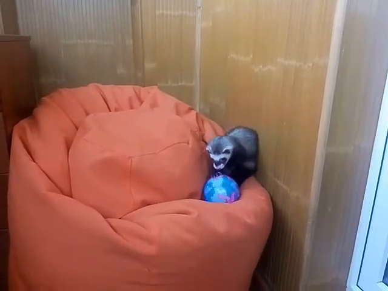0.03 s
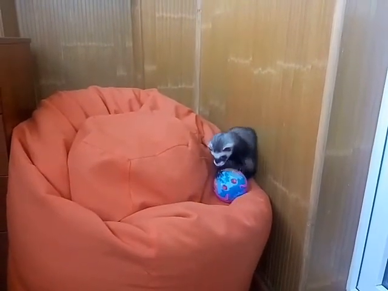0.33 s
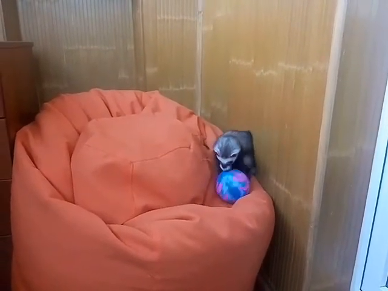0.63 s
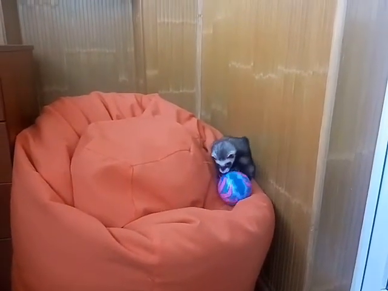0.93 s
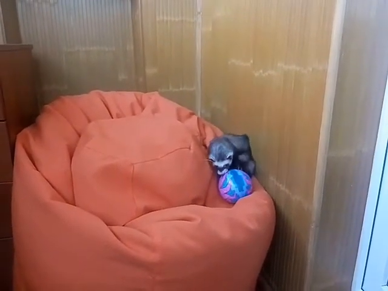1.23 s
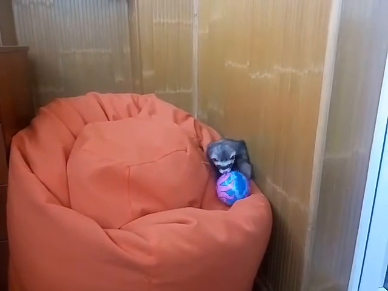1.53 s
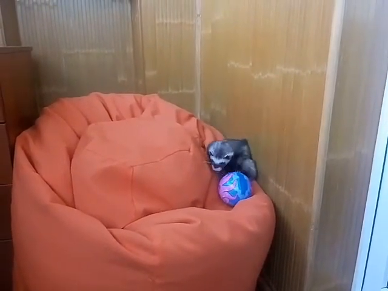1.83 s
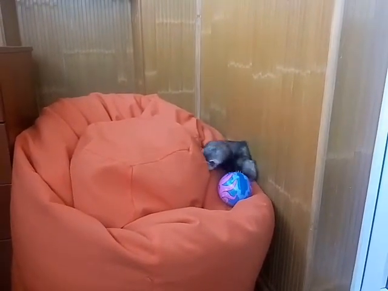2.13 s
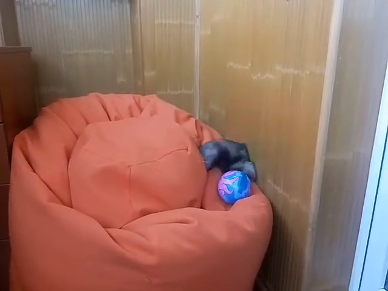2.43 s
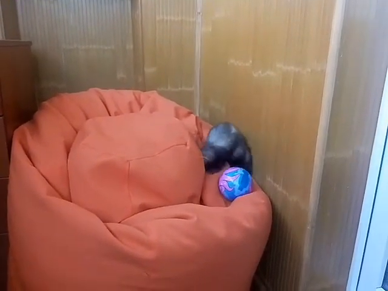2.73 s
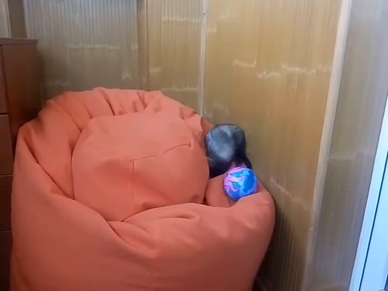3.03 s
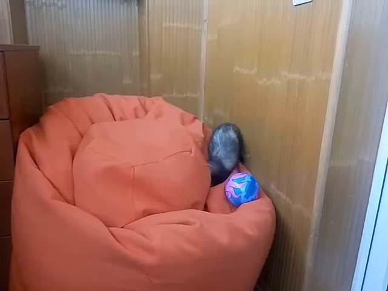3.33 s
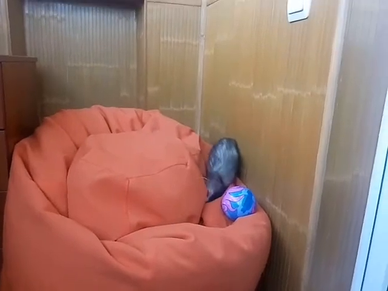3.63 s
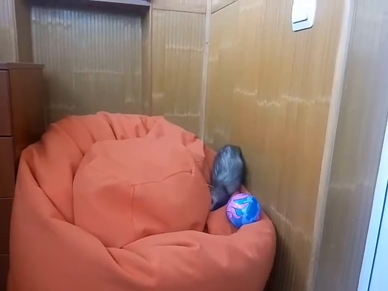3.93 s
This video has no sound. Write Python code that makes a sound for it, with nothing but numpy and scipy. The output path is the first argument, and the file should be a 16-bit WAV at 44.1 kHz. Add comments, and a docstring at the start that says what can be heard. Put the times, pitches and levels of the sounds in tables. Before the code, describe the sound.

A few sharp camera handling knocks, after faint rubbing and soft bumps on a bean bag.

```python
"""Faint rubbing, swishing cloth and soft bumps, then a few close knocks and a rattling clack.
A ferret noses a ball about on a bean bag in a small, quiet panelled room; each rub is many tiny slips.
Close to the microphone a hand-held camera shifts in the grip: its case thumps, ticks, knocks once
and closes with the clack. A low hum and a faint hiss lie underneath."""
import sys
import numpy as np
from scipy import signal
from scipy.fft import rfft, irfft
from scipy.io import wavfile

SR = 44100
rng = np.random.default_rng(int(sys.argv[2]) if len(sys.argv) > 2 else 0)


def master(y):
    """Save y as 16-bit WAV."""
    cut = np.clip(np.atleast_2d(y).T, -1, 1)
    pcm = np.round(cut * 32767)  # scale
    wavfile.write(sys.argv[1], SR, pcm.astype(np.int16))


N = 176400
T = np.arange(N) / SR


def from_db(db):
    return 10 ** (np.asarray(db) / 20)


def rms_one(x):
    return x / np.sqrt(np.mean(x ** 2) + 1e-20)


def peak_one(x):
    return x / np.abs(x).max()


def level(rows):
    """Loudness over time, from rows of t/s, level/dB."""
    return from_db(np.interp(T, *np.transpose(rows), left=-120, right=-120))


def swell(s, length):
    """A bell-shaped rise and fall."""
    return np.exp(-2 * ((T - s) / length) ** 2)


def burst(s, attack_s, t60_s):
    """A quick rise, then a fade; t60 is the time it takes to drop by 60 dB."""
    age = np.maximum(T - s, 0)
    return np.minimum(age / attack_s, 1) * from_db(-60 * age / t60_s)


def click(size=8192):
    return signal.unit_impulse(size)


def coloured_click(colour, size=8192):
    """A click whose tone follows rows of f/Hz, level/dB."""
    hz, db = np.transpose(colour)
    grid = np.maximum(np.arange(size // 2 + 1) * SR / size, 1)
    spectrum = from_db(np.interp(np.log(grid), np.log(hz), db))
    cepstrum = irfft(np.log(spectrum))
    cepstrum[1:size // 2] *= 2   # folding it packs the energy at the start of the click
    cepstrum[size // 2 + 1:] = 0
    return peak_one(irfft(np.exp(rfft(cepstrum))))


def through(x, response):
    return signal.fftconvolve(x, response)[:N]


def butter(x, hz, kind, order=2):
    return signal.sosfilt(signal.butter(order, hz, kind, fs=SR, output="sos"), x + 1e-18)


def resonate(x, hz, width):
    """A resonance: lets through a band around one pitch."""
    r = np.exp(-np.pi * width / SR)
    feedback = [1, -2 * r * np.cos(2 * np.pi * hz / SR), r * r]
    return signal.lfilter(np.array([1, 0, -1]) * (1 - r * r) / 2, feedback, x)


def narrowed(x, hz, width_hz):
    """The same resonance twice, for steep sides."""
    return rms_one(resonate(resonate(x, hz, width_hz), hz, width_hz))


def rings(x, table):
    """Several resonances side by side."""
    return rms_one(sum((-1) ** k * from_db(db) * resonate(x, hz, width)
                       for k, (hz, width, db) in enumerate(table)))


def delay_band(x, hz, width_hz):
    """One band arrives a little late, which thickens a click."""
    r = np.exp(-np.pi * width_hz / SR)
    feedback = [1, -2 * r * np.cos(2 * np.pi * hz / SR), r * r]
    return signal.lfilter(feedback[::-1], feedback, x)


def wander(x, share, per_s):
    """All pitches drift slowly up and down together."""
    speed = 1 + share * rms_one(butter(rng.standard_normal(N), per_s, "low"))
    return np.interp(np.cumsum(speed) % N, np.arange(N), x)


def add(out, s, sound):
    i = int(s * SR)
    out[i:i + len(sound)] += sound[:N - i]


def strikes(rows, sound):
    """The same sound at each row of t/s, level/dB."""
    out = np.zeros(N)
    for s, db in rows:
        add(out, s, from_db(db) * sound)
    return out


def slips(per_s, spread_db=2.5):
    """Friction: tiny random slips of uneven size."""
    pulses = (rng.random(N) < per_s / SR) * rng.choice([-1, 1], N)
    return pulses * from_db(spread_db * np.minimum(rng.exponential(1, N), 5))


def background(hiss_db=-67.5, hum_db=-68.5, hum_hz=88.7):
    """Faint hiss and a wavering low hum."""
    # tone of the hiss: f/Hz, level/dB
    hiss_colour = [(15, -30), (25, -11), (137, -1.5), (263, -9), (373, -16), (1130, -11.5), (1790, -21.5),
                   (4490, -21.5), (6740, -26), (8140, -38), (13600, -38.5), (16000, -51)]
    hiss, hum = rng.standard_normal((2, N))
    hiss = butter(through(hiss, coloured_click(hiss_colour)), 48.1, "high")
    hum = resonate(hum, hum_hz, width=7.7)
    return from_db(hiss_db) * rms_one(hiss) + from_db(hum_db) * rms_one(hum)


def room(x, t60_s=.177, echo_db=-34.5):
    """A short, dull echo from the panelled walls."""
    t = T[:SR // 2]
    tail = butter(rng.standard_normal(len(t)), 3000, "low") * from_db(-60 * t / t60_s) * (t > .005)
    return from_db(echo_db) * through(x, tail / np.sqrt(np.sum(tail ** 2)))


def panels(x, t60_s=.14, echo_db=-4.5):
    """Close echoes off the wall panels make a small sound boxy."""
    t = T[:SR // 4]
    echoes = rng.standard_normal(len(t)) * from_db(-60 * t / t60_s)
    wet = from_db(echo_db)
    return (x + wet * through(x, echoes / np.sqrt(np.sum(echoes ** 2)))) / np.sqrt(1 + wet ** 2)


def rumble():
    """Dull shudders as the grip shifts."""
    # strength of the shudders: t/s, level/dB
    loudness = [(0, -64), (.07, -56), (.25, -70), (.38, -57.5), (.52, -61), (.65, -77), (.83, -56),
                (1.0, -77.5), (1.15, -55), (1.28, -71), (1.39, -56.5), (1.5, -73), (2.7, -73),
                (2.78, -45.5), (2.85, -36.5), (2.95, -39), (3.0, -43.5), (3.12, -58.5), (3.24, -55),
                (3.33, -67), (3.39, -49.5), (3.47, -60), (3.58, -44.5), (3.65, -58.5), (3.75, -72)]
    # their tone: f/Hz, level/dB
    colour = [(30, -28.5), (65, -6.5), (95, 2.5), (140, -6), (280, -13.5), (480, -23), (800, -29),
              (2000, -74)]
    return level(loudness) * rms_one(through(slips(per_s=900, spread_db=1), coloured_click(colour)))


def cloth(slips_per_s=5000, rasp_db=-2.5):
    """The cover of the bean bag swishes and rasps with each move."""
    # moves of the cover: peak t/s, length/s, level/dB
    swishes = [(.17, 0.39, -71.5), (0.378, 0.075, -65), (0.66, 0.15, -73), (0.805, 0.084, -72.5),
               (0.998, 0.09, -79), (1.537, 0.086, -71), (1.757, 0.093, -75.5), (2.339, 0.1, -67.5),
               (2.552, 0.13, -70), (2.777, 0.085, -63.5), (2.991, 0.17, -63), (3.255, 0.088, -69),
               (3.641, 0.11, -68), (3.807, 0.14, -71)]
    # tone of the swish: f/Hz, level/dB
    colour = [(300, -28), (1000, 2.5), (2000, 3.5), (3000, 2), (4700, -1), (6300, -8), (7800, -39),
              (14000, -48.5)]
    # raspy resonances: f/Hz, width/Hz, level/dB
    rasp_rings = [(2343, 130, 2), (3520, 140, -2), (4610, 170, -3)]
    motion = sum(from_db(db) * swell(s, length) for s, length, db in swishes)
    hiss = rms_one(through(slips(slips_per_s), coloured_click(colour)))
    rasp = butter(rings(slips(slips_per_s), rasp_rings), 6000, "low", order=6)
    rasp = wander(rasp, share=.05, per_s=3)   # the cover stretches
    return motion * rms_one(panels(hiss + from_db(rasp_db) * rasp))


def rubbing(slips_per_s=4000, turn_s=2.05, turn_length_s=.4):
    """The ferret rubs the ball, then turns to the wall: hollow slips that at times scrape or squeak."""
    # strength of the rubbing: t/s, level/dB
    loudness = [(0, -57), (.04, -62), (.1, -61), (.16, -52), (.215, -57), (.31, -58), (.39, -52.5),
                (.46, -65.5), (.56, -78), (.62, -57.5), (.69, -59.5), (.76, -62.5), (.83, -61.5),
                (.93, -71.5), (1.0, -60.5), (1.07, -63.5), (1.16, -68), (1.36, -72.5), (1.45, -67),
                (1.6, -61), (1.75, -57), (1.91, -71.5), (2.26, -67.5), (2.44, -68), (2.57, -61.5),
                (2.64, -74.5), (2.79, -53), (2.95, -56.5), (3.1, -63.5), (3.27, -64), (3.35, -71),
                (3.68, -65.5), (3.85, -58), (3.95, -65), (4, -62.5)]
    # broad tone under the resonances: f/Hz, level/dB
    colour = [(80, -18.5), (300, -6), (560, -6), (1200, -11.5), (1900, -18.5), (4000, -34), (8000, -58.5)]
    # resonances of the ball and of the wall: f/Hz, width/Hz, level/dB
    ball_rings = [(322, 55, -0.5), (785, 67, 3.5), (1050, 170, -2), (1290, 190, -8.5)]
    wall_rings = [(899, 150, -0.5), (1160, 220, -0.5), (1415, 290, -7)]
    # the rubbing catches: t/s, level/dB, f/Hz
    catches = [(.109, -53.5, 900), (.223, -46, 900), (.361, -48, 760), (.696, -53, 850), (.978, -56, 880),
               (1.630, -50, 640)]
    # thin squeaks: peak t/s, length/s, f/Hz, level/dB
    squeak_notes = [(0.823, 0.076, 1492, -62), (1.377, 0.11, 803, -66.5), (2.17, 0.086, 902, -68.5),
                    (3.91, 0.11, 1733, -67.5)]
    grains = slips(slips_per_s)
    turned = np.clip(.5 + (T - turn_s) / turn_length_s, 0, 1)
    ball = np.sqrt(1 - turned) * rings(grains, ball_rings)
    wall = np.sqrt(turned) * rings(grains, wall_rings)
    hollow = rms_one(butter(ball + wall, 2200, "low"))
    broad = rms_one(through(slips(slips_per_s), coloured_click(colour)))
    rub = level(loudness) * rms_one(panels(hollow + from_db(-1.5) * broad))
    scrapes = sum(from_db(db) * burst(s, attack_s=.001, t60_s=.16) * narrowed(grains, hz, width_hz=600)
                  for s, db, hz in catches)
    squeaks = sum(from_db(db) * swell(s, length) * narrowed(grains, hz, width_hz=120)
                  for s, length, hz, db in squeak_notes)
    return rub + butter(scrapes, 1400, "low", order=6) + squeaks


def slide():
    """Skin slides over the case with a fine, bright hiss."""
    # strength of the hiss: t/s, level/dB
    loudness = [(3.444, -69), (3.449, -45.5), (3.485, -62), (3.55, -60), (3.6, -63.5), (3.65, -78)]
    grains = slips(per_s=6000, spread_db=3)
    return level(loudness) * rms_one(butter(grains, [2160, 6850], "band", order=8))


def boom(band_hz=(74.5, 144)):
    """The few low swings of the case after a push."""
    return peak_one(butter(click(), band_hz, "band"))


def bumps(boom_db=-11.5):
    """A soft contact gives one dull swing, a faint edge and a little boom."""
    # soft contacts: t/s, level/dB, f/Hz
    contacts = [(.039, -43, 187), (.063, -35, 183), (0.078, -38.5, 188), (0.152, -43.5, 290),
                (.375, -40.5, 157), (.483, -39, 221), (0.519, -50, 158), (0.767, -37.5, 250),
                (.824, -43, 127), (.838, -44, 128), (1.114, -37, 202), (1.127, -42, 178),
                (1.141, -39.5, 178), (1.363, -37, 193), (1.376, -34, 194), (2.075, -46, 185),
                (2.656, -46.5, 202), (2.743, -29.5, 182), (2.778, -28.5, 252), (2.784, -21, 208),
                (2.804, -20, 182), (2.830, -4, 324), (3.225, -42.5, 171), (3.36, -41.5, 180),
                (3.38, -36, 160), (3.406, -32.5, 440), (3.412, -29, 480), (3.422, -32, 240),
                (3.455, -21, 330), (3.496, -33, 776), (3.5361, -29.5, 750)]
    out, body = np.zeros(N), from_db(boom_db) * boom()
    for s, db, hz in contacts:
        push = butter(click(), hz * .51, "high")
        swing = peak_one(butter(push, hz * 1.505, "low", order=6))
        edge_db = -11 + .53 * db   # harder bumps sound sharper
        edge = from_db(edge_db) * peak_one(butter(push, hz * 2, "low", order=3))
        add(out, s - .23 / hz, from_db(db) * (swing + edge - body))
    return out


def ticks():
    """Small, hard contacts on the case give dry ticks."""
    # contacts: t/s, level/dB
    contacts = [(2.8028, -26.5), (2.8079, -8.5), (2.832, -35.5), (3.4548, -31.5), (3.4617, -34.5),
                (3.4749, -29.5), (3.4787, -34), (3.5354, -28.5), (3.5537, -34)]
    # tone of a tick: f/Hz, level/dB
    colour = [(100, -13), (600, 0.5), (1400, 2), (2500, -5), (4000, -2), (6200, -7), (8000, -23.5),
              (10000, -30.5), (16000, -48)]
    return strikes(contacts, coloured_click(colour))


def knock(at_s=3.4454, crack_db=-.5, boom_db=-6, boom_lag_s=.00076):
    """One hard hit on the case: a crack with a deep boom."""
    # tone of the crack: f/Hz, level/dB
    colour = [(40, -17.5), (170, 2.5), (500, 0), (1000, -4.5), (2000, -13.5), (4000, -17.5), (6000, -29),
              (7600, -55.5), (16000, -72.5)]
    crack = strikes([(at_s, crack_db)], coloured_click(colour))
    return crack - strikes([(at_s + boom_lag_s, boom_db)], boom())


def clack(ring_db=-30.5, crackle_db=-49):
    """The grip creaks over the case, which shuts in a crackling run of catches; both make it ring."""
    # the catches: t/s, level/dB
    catches = [(3.5593, -19.5), (3.5604, -20), (3.5688, -17.5), (3.5701, -12), (3.5713, 0), (3.5722, -19.5),
               (3.5752, -20), (3.5835, -24.5), (3.5865, -23)]
    # tone of one catch: f/Hz, level/dB
    colour = [(40, -31.5), (90, -3), (400, -5.5), (820, 4), (1300, 2.3), (1800, -12), (2900, -9.5),
              (4300, -15), (5300, -19.5), (6400, -12), (9000, -40.5), (11500, -36), (14000, -51),
              (16000, -68)]
    # ringing notes of the case: f/Hz, level/dB, t60/s
    case_notes = [(735, -12, 0.0842), (1030, -5, 0.055), (1333, -6.5, .075), (2060, -4, .045),
                  (2830, -1.5, 0.019), (3265, -9.5, .045), (4003, -5, 0.056), (4100, 3, .02),
                  (4600, -15.5, 0.044)]
    # the grip sliding on the case: t/s, level/dB
    creak_loudness = [(3.39, -77.5), (3.412, -51.5), (3.435, -59), (3.46, -56.5), (3.49, -54.5),
                      (3.55, -55.5), (3.573, -26.5), (3.585, -31), (3.602, -57), (3.64, -69), (3.72, -74.5)]
    hit = delay_band(coloured_click(colour), hz=1640, width_hz=670)
    t = T[:len(hit)]
    hit += sum(from_db(ring_db + db - 60 * t / t60) * np.sin(2 * np.pi * hz * t)
               for hz, db, t60 in case_notes)
    grains = slips(per_s=3500)
    creak = level(creak_loudness) * rms_one(butter(through(grains, hit), 5220, "low"))
    spray = sum(from_db(crackle_db + db) * burst(s - .004, attack_s=.004, t60_s=.045)
                for s, db in catches)
    crackle = spray * rms_one(butter(grains, [3500, 12000], "band", order=4))
    return strikes(catches, hit) + creak + crackle


def scene():
    """All sounds in one channel; the hits also echo in the room."""
    hits = bumps() + knock() + ticks() + clack()
    return (hits + room(hits) + slide() + rubbing() + cloth() + rumble() + background())[None]


def record(dry, cutoff_hz=16450):
    """The very highest treble is cut off."""
    return signal.sosfilt(signal.cheby2(12, 70, cutoff_hz, fs=SR, output="sos"), dry)


dry = scene()
out = record(dry)
master(out)
```